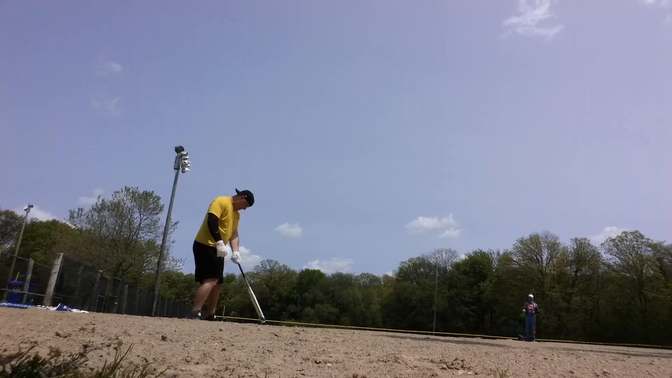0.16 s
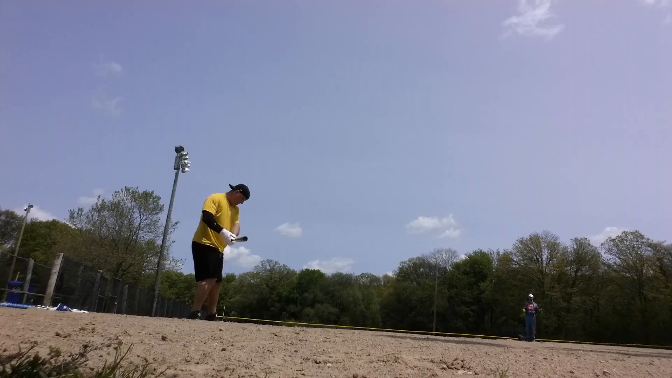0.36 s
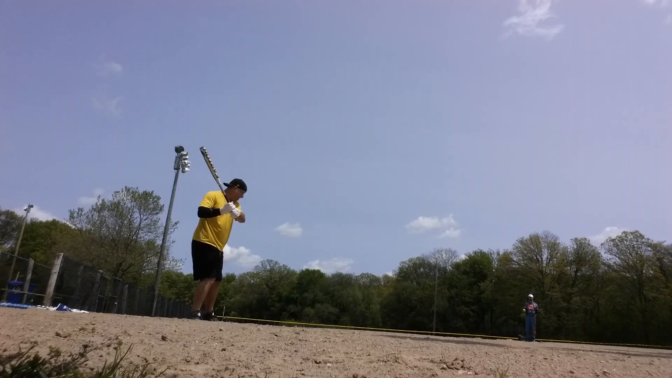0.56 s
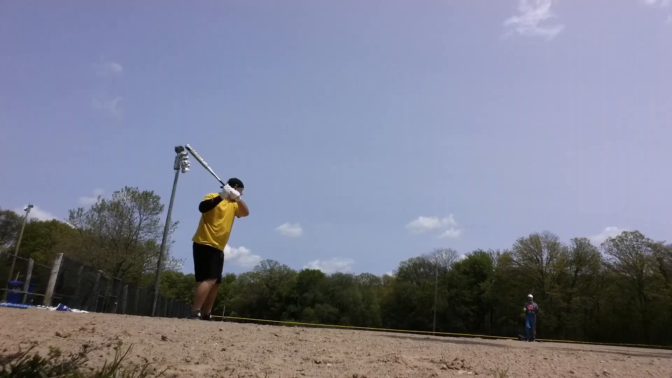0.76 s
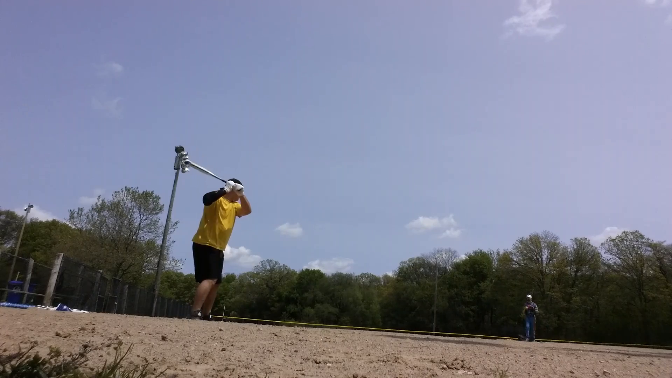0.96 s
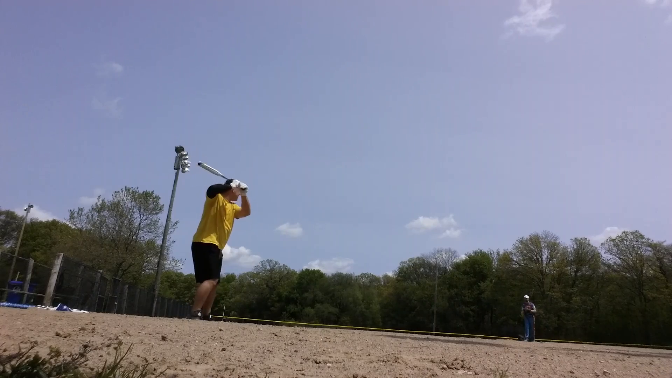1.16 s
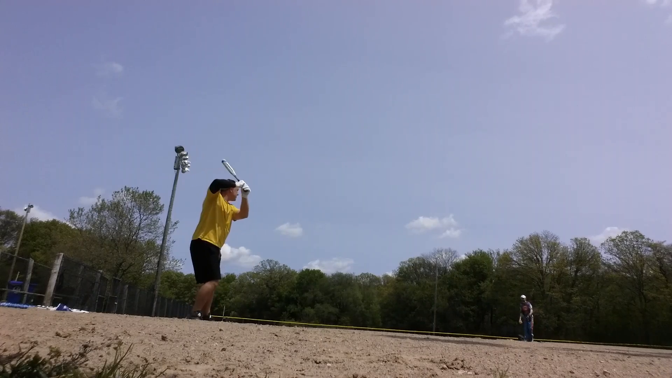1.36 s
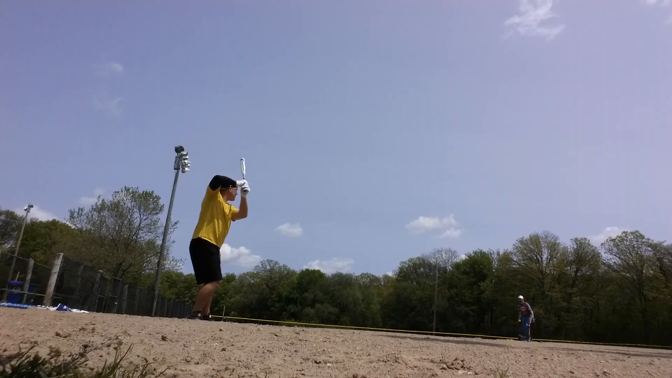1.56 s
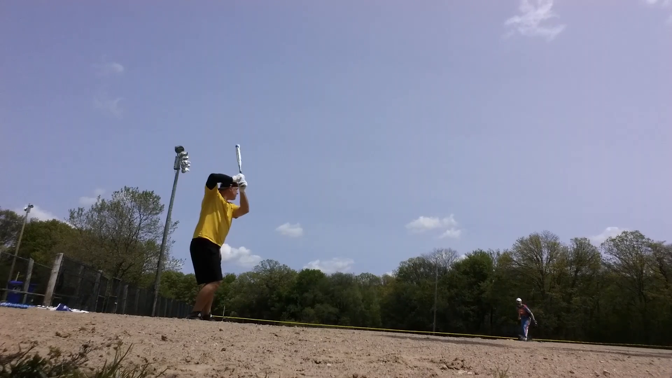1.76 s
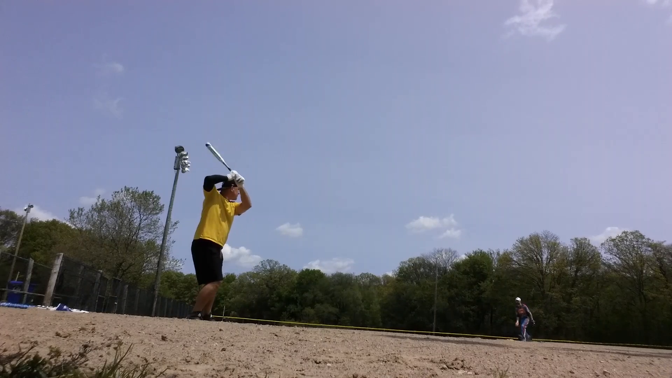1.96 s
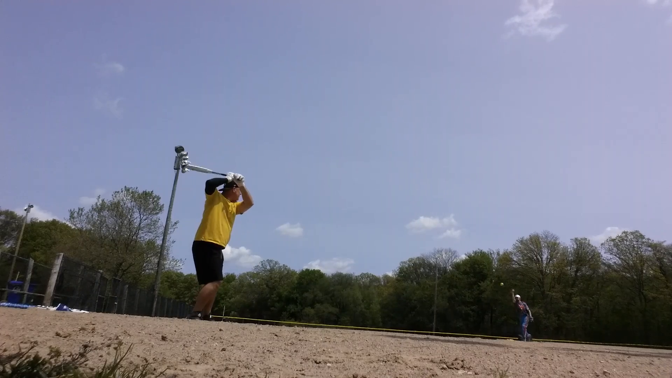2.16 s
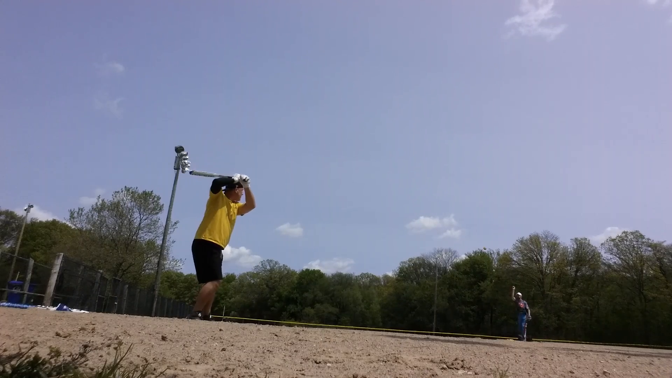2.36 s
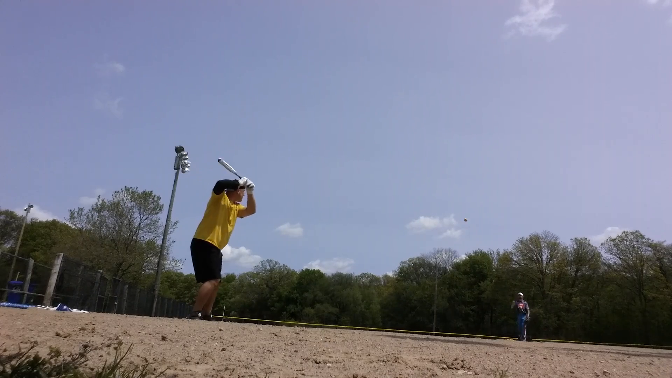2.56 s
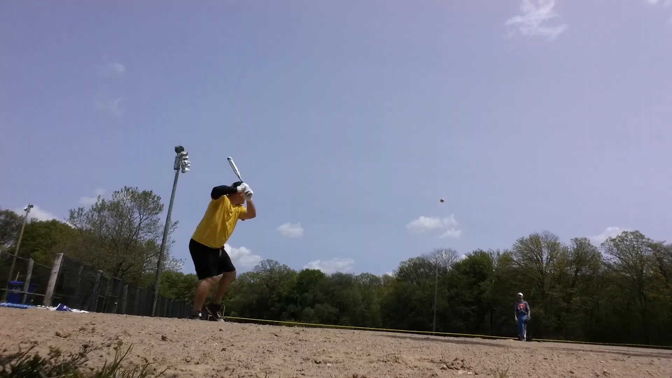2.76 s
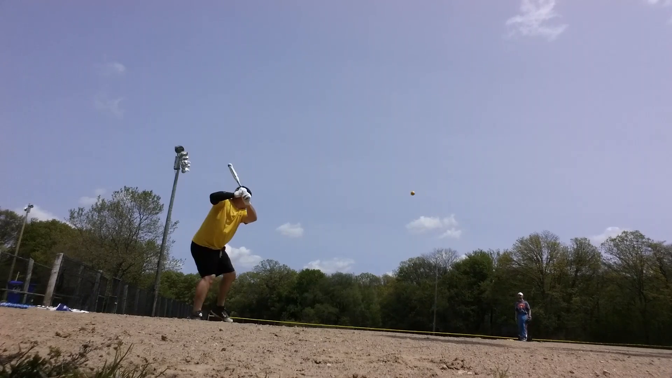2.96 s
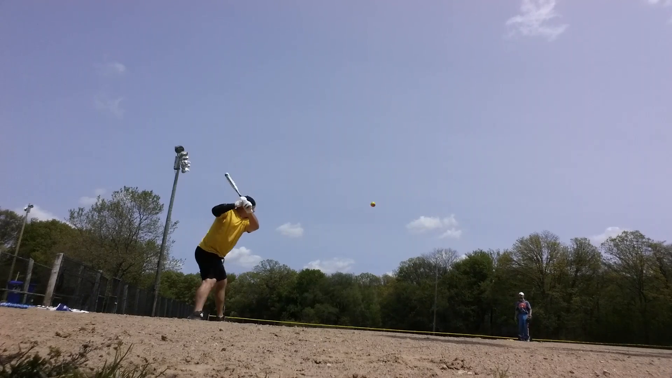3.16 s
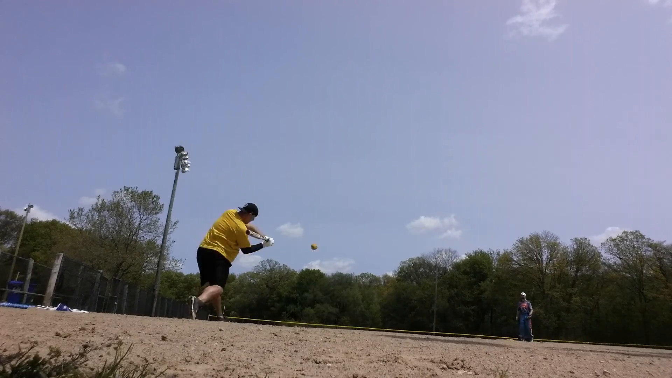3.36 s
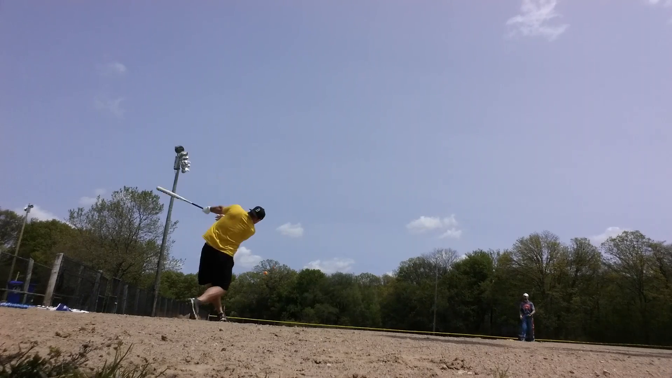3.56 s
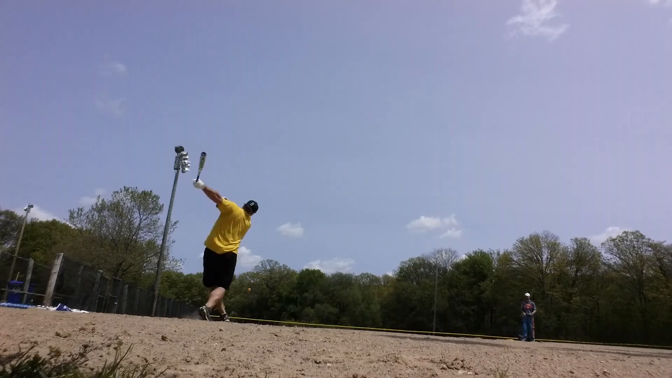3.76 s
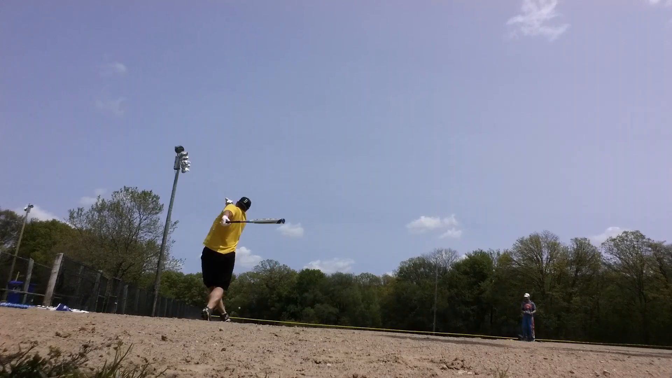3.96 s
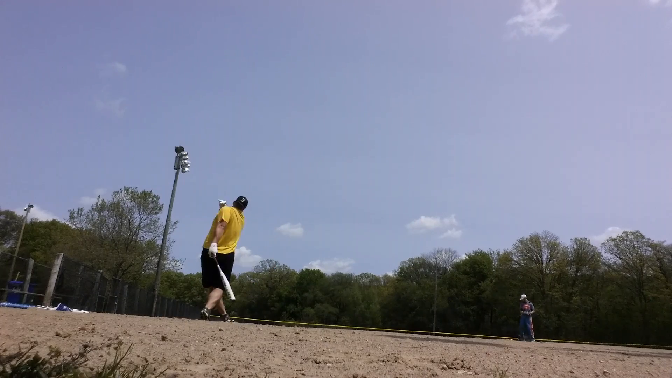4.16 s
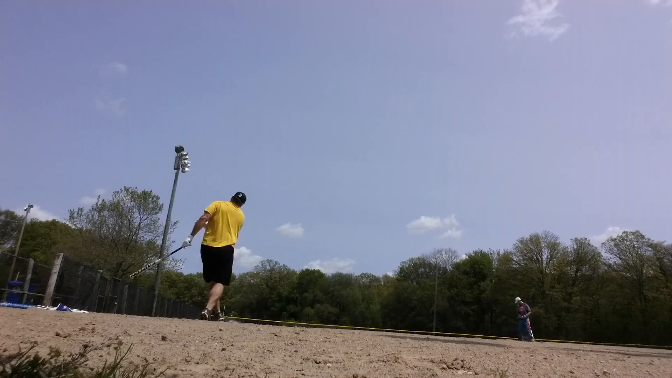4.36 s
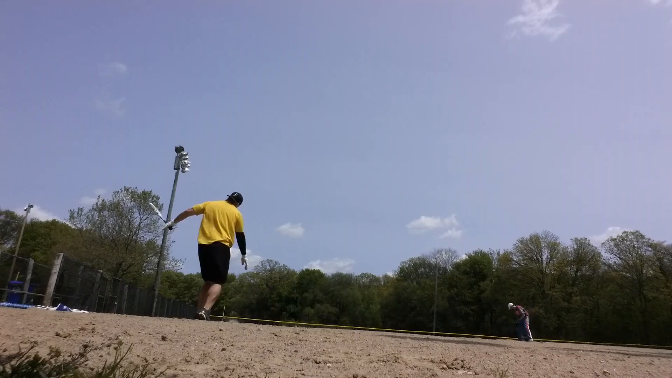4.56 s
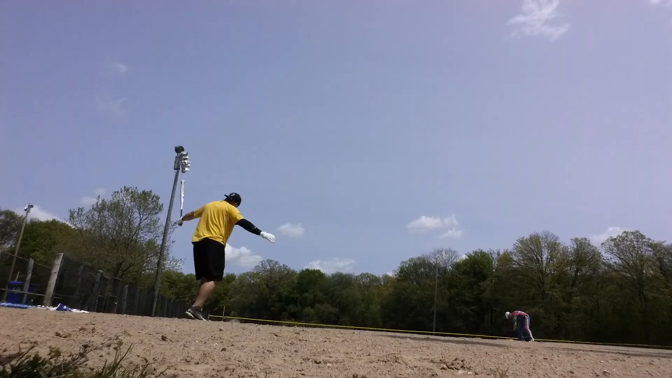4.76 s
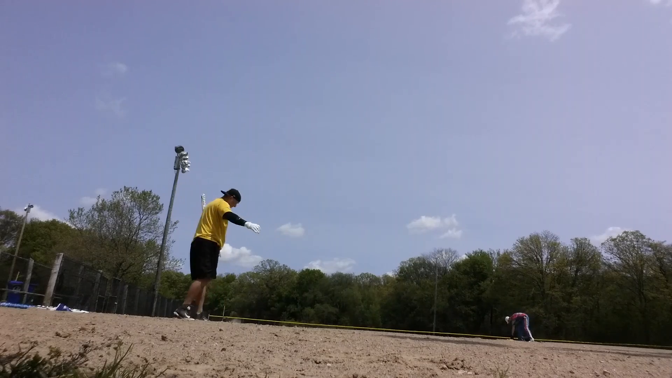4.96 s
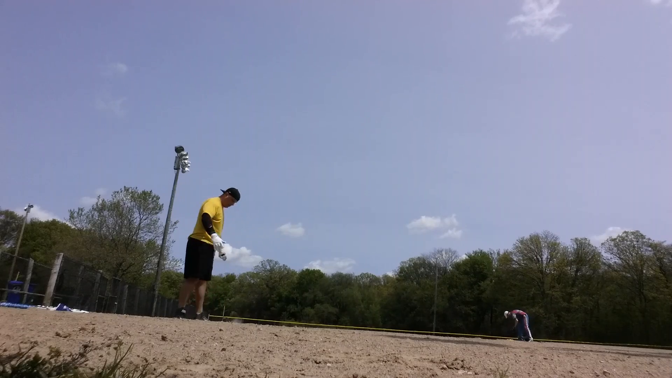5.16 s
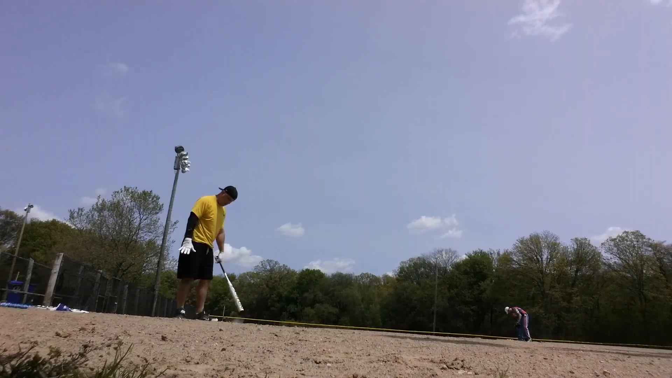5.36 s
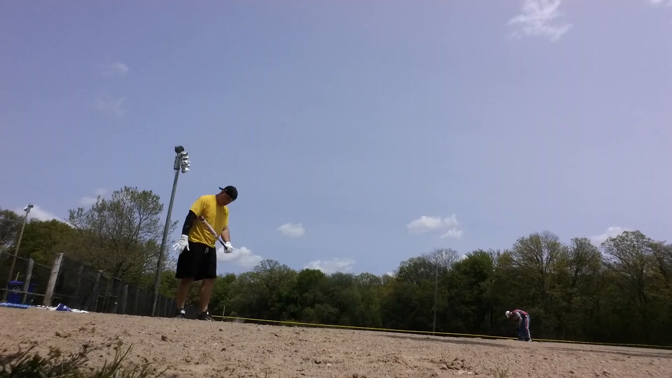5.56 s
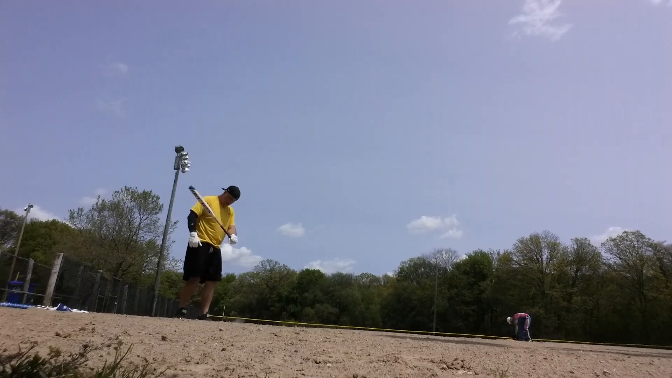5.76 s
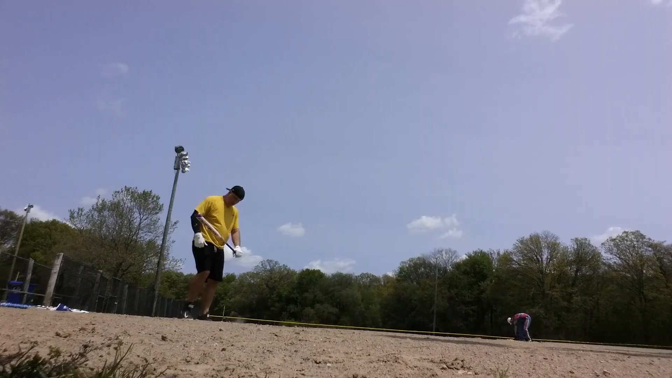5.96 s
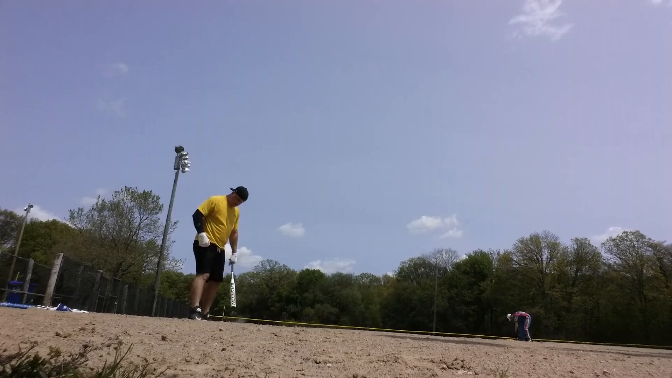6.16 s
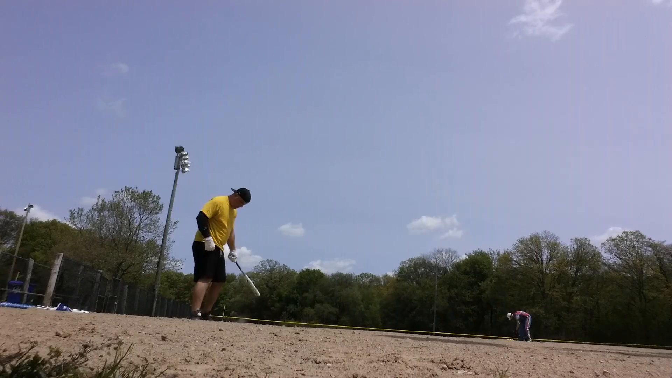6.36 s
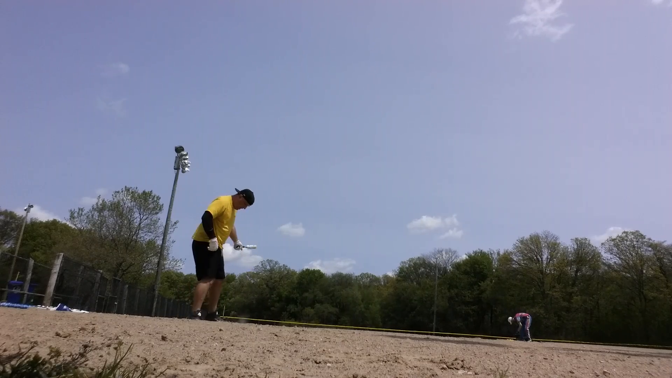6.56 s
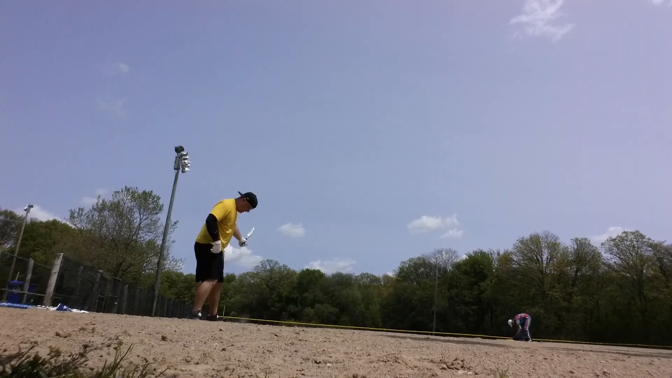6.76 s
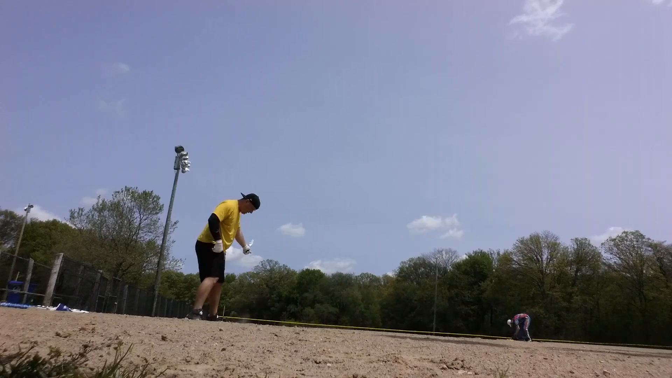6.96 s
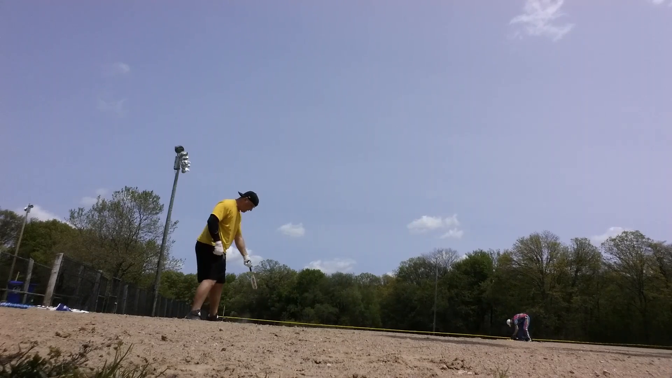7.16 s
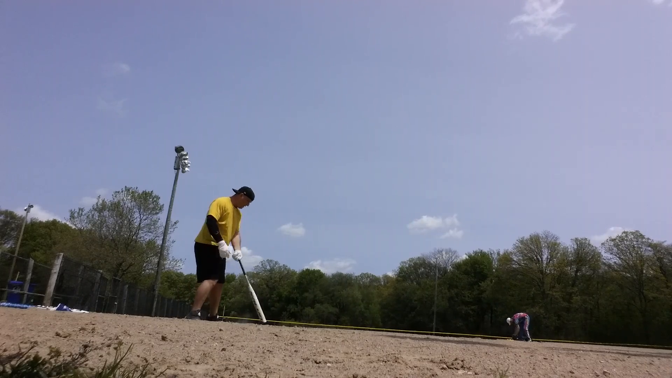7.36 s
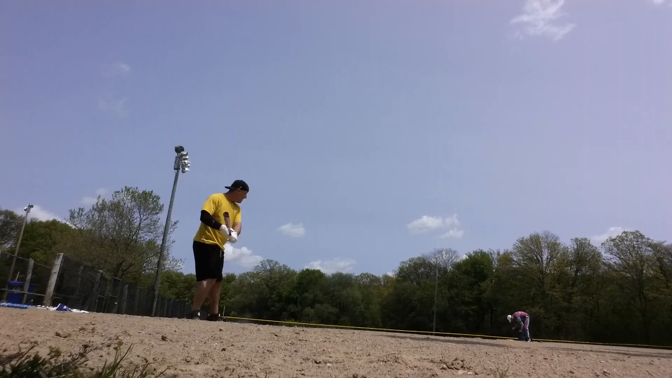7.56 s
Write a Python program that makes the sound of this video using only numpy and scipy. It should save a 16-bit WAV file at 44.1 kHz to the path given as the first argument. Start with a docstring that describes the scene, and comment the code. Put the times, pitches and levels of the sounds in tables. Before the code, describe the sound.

Quiet open field with distant traffic, faint peeps and shoe scuffs, then one sharp loud metallic bat crack that rings and echoes away.

```python
"""Traffic and a far engine drone over an open field, a bird peeps and chirps, and shoes scuff the dirt.
A metal bat swishes and cracks into a softball: shaped noise for air and contact, ringing modes for the tube.
The ping bends in pitch as the bat swings round; a backstop, a fence and the field throw the blow back.
The blow overloads the camera, whose gain control ducks for about a second; more chirps and scuffs follow."""
import sys
import numpy as np
from scipy import signal
from scipy.fft import rfft, irfft, next_fast_len
from scipy.io import wavfile
from scipy.ndimage import minimum_filter1d, map_coordinates

SR = 44100
rng = np.random.default_rng(int(sys.argv[2]) if len(sys.argv) > 2 else 0)


def unload_audio(sound):
    """Save the sound as a 16-bit wav file, at the path given as the first command line argument."""
    columns = np.transpose(np.atleast_2d(sound))
    # keep every value between -1 and 1, then stretch to whole-number steps
    steps = np.round(np.clip(columns, -1, 1) * 32767)
    wavfile.write(sys.argv[1], SR, steps.astype(np.int16))


N = 339129
TIME = np.arange(N) / SR
HIT_S = 3.6078  # the moment of contact


def amp(db):
    """Decibels to gain."""
    return 10 ** (np.asarray(db) / 20)


def unit(x):
    """Scale to rms 1."""
    return x / np.sqrt(np.mean(x ** 2) + 1e-20)


def along(points, hz):
    """Read (Hz, value) points on a log frequency axis."""
    point_hz, value = np.transpose(points)
    return np.interp(np.log(hz + 1), np.log(point_hz + 1), value)


def bell(x, centre, width):
    """A smooth bump of height 1."""
    return np.exp(-((x - centre) / width) ** 2)


def wobble(rate):
    """A smooth random curve with rate knots a second."""
    knots = rng.standard_normal(int(N * rate / SR) + 4)
    return map_coordinates(knots, [TIME * rate])


def phase_of(hz):
    """Phase in radians of a tone that follows a pitch curve."""
    return 2 * np.pi * np.cumsum(hz) / SR


def burst(start, rise, t60):
    """An envelope that swells up to its start time and then dies away."""
    swell = np.exp(np.minimum(TIME - start, 0) / rise)
    return swell * amp(-60 * np.maximum(TIME - start, 0) / t60)


def filtered(x, response):
    """Multiply the spectrum of x by a response of frequency."""
    size = next_fast_len(N + SR // 2)
    spectrum = rfft(x, size) * response(np.fft.rfftfreq(size, 1 / SR))
    return irfft(spectrum, size)[..., :N]


def pan(db):
    """Left and right gains for a left-right level difference."""
    return amp([[db / 2], [-db / 2]])


def place(x, pan_db, lag_ms):
    """The left microphone hears the sound a little later than the right."""
    shift = lambda hz: np.exp(np.outer([-1, 1], 1j * np.pi * hz * lag_ms / 10 ** 3))
    return pan(pan_db) * filtered(x, shift)


def rush(spectrum, alike):
    """Stereo noise of rms 1: level over frequency, and how alike left and right are."""
    def response(hz):
        turn = np.arccos(np.clip(along(alike, hz), -1, 1)) / 2
        return amp(along(spectrum, hz)) * np.array([np.cos(turn), np.sin(turn)])
    mid, side = filtered(rng.standard_normal((2, N)), response)
    return unit(np.array([mid + side, mid - side]))


def scatter(x, decay, delay):
    """Sound thrown back by many small surfaces, each frequency dying at its own speed."""
    hz, t, grains = signal.stft(rng.standard_normal((2, SR)), SR, nperseg=256)
    fade = amp(-60 * t / along(decay, hz)[:, None])
    tail = signal.istft(grains * fade, SR, nperseg=256)[1]
    tail = tail / np.linalg.norm(tail[0])
    tail = np.pad(tail, ((0, 0), (int(delay * SR), 0)))
    return signal.fftconvolve(x, tail, axes=1)[:, :N]


# colour of the microphones' hiss: freq_hz, relative_level_db (per Hz)
HISS_COLOUR = [(1000, -12.5), (4000, 0.5), (6000, 1), (9000, -2.5), (12500, 0.5), (15400, 2)]


def hiss():
    """The microphones' own noise, unrelated left and right."""
    return amp(-62) * rush(HISS_COLOUR, [(1000, 0)]) * pan(0.95)


# colour of the low traffic rumble: freq_hz, relative_level_db (per Hz)
RUMBLE_COLOUR = [(20, -43), (38, -21), (58, -4.5), (115, 1), (160, -3.5), (230, -6.5), (330, -18.5),
                 (600, -49)]
# colour of the tyre wash: freq_hz, relative_level_db (per Hz)
TYRE_COLOUR = [(120, -16.5), (300, 1), (450, -1), (650, -2), (1000, -0.5), (1250, -7.5), (1700, -7.5),
               (2200, -14.5), (2700, -18), (3200, -23.5), (5000, -35), (9000, -45)]
# how alike the traffic is left and right: freq_hz, likeness (0 to 1)
TRAFFIC_LIKENESS = [(100, .98), (250, 0.98), (520, 1), (900, 0.46), (1350, .66), (2000, .3), (3500, 0.035)]
RUMBLE_DB, TYRE_DB = -44, -48.5  # levels at the start
RUMBLE_DB_PER_S, TYRE_DB_PER_S = -0.17, 0.2548  # slow drift


def traffic():
    """Low rumble and tyre wash, as shaped noise, from a road off to the right."""
    rumble_db = RUMBLE_DB + RUMBLE_DB_PER_S * TIME + 0.7 * wobble(10)
    tyre_db = TYRE_DB + TYRE_DB_PER_S * TIME + 0.8 * wobble(9.3)
    rumble = amp(rumble_db) * rush(RUMBLE_COLOUR, TRAFFIC_LIKENESS)
    tyres = amp(tyre_db) * rush(TYRE_COLOUR, TRAFFIC_LIKENESS)
    return place(rumble + tyres, pan_db=-4.0, lag_ms=0.35)


# partials of the engine: order (multiple of the firing rate), relative_level_db
FIRING_ORDERS = [(1, -15.5), (1.5, -14), (2, -1), (2.5, -6.5), (3, 1), (3.5, -8.5), (4, -16.5), (5, -24.5)]
# resonance of the exhaust: freq_hz, gain_db
EXHAUST_RESONANCE = [(50, -9.5), (100, -6.5), (130, 0), (170, -5), (195, -13.5), (330, -10.5)]
FREE_HZ = 64.55  # firing rate when running free
SAG_HZ, SAG_AT_S, SAG_S = 15.9, 2.06, 1.46  # sag under load: depth, deepest moment, width
OVERSHOOT_HZ, OVERSHOOT_AT_S, OVERSHOOT_S = 3.1, 4.62, 0.85  # it races as the load comes off
ENGINE_DB, LOAD_DB_PER_HZ = -44, 0.2022  # base level when free, rise as it is dragged down
BOOM_HZ, BOOM_WIDTH_HZ, BOOM_DB = 56.4, 2.4, 5  # the firing rate at which it booms


def engine():
    """A far engine sags, overshoots and settles; its orders slide through the exhaust's resonance."""
    sag_hz = SAG_HZ * bell(TIME, SAG_AT_S, SAG_S)
    overshoot_hz = OVERSHOOT_HZ * bell(TIME, OVERSHOOT_AT_S, OVERSHOOT_S)
    firing_hz = FREE_HZ - sag_hz + overshoot_hz
    load_db = LOAD_DB_PER_HZ * (FREE_HZ - firing_hz)
    engine_db = ENGINE_DB + load_db + BOOM_DB * bell(firing_hz, BOOM_HZ, BOOM_WIDTH_HZ)
    phase = phase_of(firing_hz * (1 + 0.0025 * wobble(6.8)))
    drone = 0
    for order, order_db in FIRING_ORDERS:
        exhaust_db = along(EXHAUST_RESONANCE, order * firing_hz)
        level = amp(engine_db + order_db + exhaust_db + 1.6 * wobble(4))
        drone = drone + level * np.sin(order * phase + 0.087 * wobble(15))
    return place(drone, pan_db=-3.0, lag_ms=0.31)


# chirps: start_s, level_db (before accents), time_stretch, lowest_hz (before lingering), dip_accent_db
CHIRP_CALLS = [(1.665, -54.5, 0.96, 2150, 10), (5.138, -52, 0.96, 2280, -1), (6.478, -52, 1.1, 2100, -1)]
# fainter birds: centre_s, level_db, pitch_hz (before a slight waver)
PEEP_CALLS = [(.68, -73, 3880), (.97, -73, 3900), (1.17, -72, 3900), (1.34, -69.5, 3900), (1.52, -71, 3900),
              (5.349, -67, 3275), (5.478, -69, 3570)]
START_HZ, NOTE_HZ = 3100, 2620  # first pitch before lingering; the note the chirp settles on
FALL_S, RETURN_S = 0.057, 0.0193  # slide down and slide back, before the time stretch
CHIRP_S, EDGE_S = 0.1, 0.0059  # length and fade at each end, before the time stretch
LINGER, LINGER_WIDTH_HZ = 0.54, 260  # pitch is drawn to the note: share, range
NOTE_DB, NOTE_WIDTH_HZ, SWELL_DB_PER_S = 9.5, 80, 72  # louder on the note, and towards the end
PEEP_S = 0.048  # full width of the peep's bell


def chirps():
    """A whistle slides down and back up to its note, loudest near the note."""
    song = 0
    for start_s, level_db, stretch, lowest_hz, dip_db in CHIRP_CALLS:
        age = np.clip((TIME - start_s) / stretch, 0, CHIRP_S)
        hz = np.interp(age, [0, FALL_S, FALL_S + RETURN_S], [START_HZ, lowest_hz, NOTE_HZ])
        hz = hz - LINGER * (hz - NOTE_HZ) * bell(hz, NOTE_HZ, LINGER_WIDTH_HZ)
        note_db = NOTE_DB * bell(hz, NOTE_HZ, NOTE_WIDTH_HZ)
        accent_db = note_db + dip_db * bell(age, FALL_S, width=0.0097)
        swell_db = SWELL_DB_PER_S * (age - FALL_S)
        gate = np.minimum(np.minimum(age, CHIRP_S - age) / EDGE_S, 1)
        whistle = np.sin(phase_of(hz * (1 + 0.013 * wobble(300))))
        song = song + gate * amp(level_db + accent_db + swell_db) * whistle
    return song


def peeps():
    """Other birds farther off: short whistles with a slight waver."""
    song = 0
    for centre_s, level_db, hz in PEEP_CALLS:
        whistle = np.sin(phase_of(hz * (1 + 0.014 * wobble(60))))
        song = song + amp(level_db) * bell(TIME, centre_s, PEEP_S / 2) * whistle
    return song


def birds():
    """Leaves blur the whistles with a short scatter and the woods hold them with a long one."""
    song = place(chirps() + peeps(), pan_db=-7.0, lag_ms=0.018)
    leaves = scatter(song, [(2600, 0.2)], delay=0.004)
    woods = scatter(song, [(2600, 1.26)], delay=0.018)
    return song + amp(-13) * leaves + amp(-5.5) * woods


# thuds and scuffs on the dirt: peak_s, level_db, centre_hz, rise_s, t60_s, grit_db (at 4 x centre_hz)
DIRT_SCUFFS = [(1.777, -33.5, 165, 0.0074, 0.089, -70), (2.699, -56, 1194, 0.0041, 0.068, -20),
               (3.16, -50.5, 940, 0.045, 0.3, -50), (3.341, -33, 700, 0.0006, 0.024, -42),
               (3.495, -24.5, 1100, .0004, 0.022, -54), (4.384, -28.5, 320, 0.0015, 0.1, -45),
               (6.339, -61, 3000, 0.0019, 0.053, -6.5), (6.514, -55.5, 3520, 0.0021, 0.038, -10)]


def scuffs():
    """Short dull thuds and rubs with grit on top; each one's energy is set by its envelope."""
    dirt = 0
    for peak_s, level_db, hz, rise_s, t60_s, grit_db in DIRT_SCUFFS:
        colour = [(hz / 4, -30), (hz * 0.58, 0), (hz * 1.1, -2), (hz * 4, grit_db), (16000, grit_db - 7.5)]
        envelope = burst(peak_s, rise_s, t60_s)
        energy = np.sqrt(np.mean(envelope ** 2))
        dirt = dirt + amp(level_db) * energy * unit(envelope * rush(colour, [(100, 0.8)]))
    return dirt * pan(-3.5)


SWISH_S, SWISH_DB, SWISH_HALF_S = 3.477, -43.5, 0.071  # loudest moment, level, time to fall 6 dB
FASTEST_S, FAST_S = 3.515, 0.052  # barrel speed: peak moment, width
SLOW_HZ, FAST_HZ = 450, 1330  # eddy pitch when slow and at the fastest


def swish():
    """Air shed by the barrel swells as it passes and rises in pitch with its speed."""
    swell = 0.5 ** (((TIME - SWISH_S) / SWISH_HALF_S) ** 2)
    level = amp(SWISH_DB + 2.4 * wobble(60)) * swell
    centre_hz = SLOW_HZ + (FAST_HZ - SLOW_HZ) * bell(TIME, FASTEST_S, FAST_S)
    eddies = rush([(10, -2), (500, -1.5), (1100, -8), (2000, -21.5), (6000, -44)], [(100, 0.99)])
    # low noise times a gliding tone makes a band of noise round the eddy pitch
    air = unit(eddies * np.cos(phase_of(centre_hz)))
    return place(level * air, pan_db=-5.0, lag_ms=0.15)


def thock(db, squash_s):
    """The ball is squashed and springs back: one push of air and its suction."""
    u = np.maximum(TIME - HIT_S, 0) / squash_s
    return amp(db) * (TIME >= HIT_S) * (1 - u) * np.exp(-u) * pan(-1.3)


# colour of the contact: freq_hz, relative_level_db (per Hz)
CRACK_COLOUR = [(40, -38), (200, -17.5), (330, -8), (480, 7), (750, 0.5), (1000, 5.5), (1400, -6.5),
                (2300, -2.5), (4000, -2), (6500, -7.5), (9000, -8), (9900, -23), (11000, -17.5),
                (15000, -14.5)]


def crack():
    """Noise of the contact itself, then of dense short-lived wall modes and spray off the ground."""
    struck = TIME >= HIT_S
    contact = amp(-3.5) * struck * burst(HIT_S, 1, t60=0.017)
    wall_and_spray = amp(-18.0) * struck * burst(HIT_S, 1, t60=0.15)
    return (contact + wall_and_spray) * rush(CRACK_COLOUR, [(400, 0.41), (2500, 0.23), (6000, 0.077)])


ROUND_AFTER_S, ROUND_S = 0.087, 0.003  # the barrel comes round the batter: when, how suddenly
LOBES_PER_S, SPIN_DOWN_S = 16.2, 0.4  # the slowing turn: rate at the first null, time constant
END_ON_AFTER_S, NULL_SHARE = 0.073, 0.05  # first null after contact, gain left in a null
PING_DB, PING_T60_S, PING_FLUTTER_DB = -17.5, 0.76, 3.2  # the main mode's long after-ring
SHADOW_AFTER_S, SHADOW_S, SHADOW_DB = 0.222, 0.008, -9  # behind the batter's back: when, speed, loss


def after_ring_gain(age):
    """The bat comes round the batter, its turn sweeps lobes past the camera, then his body shades it."""
    passed = lambda when, width: (1 + np.tanh((age - when) / width)) / 2
    lobes = LOBES_PER_S * SPIN_DOWN_S * (1 - np.exp((END_ON_AFTER_S - age) / SPIN_DOWN_S))
    facing = NULL_SHARE + np.abs(np.sin(np.pi * lobes)) ** 0.5
    db = PING_DB + PING_FLUTTER_DB * wobble(90) + SHADOW_DB * passed(SHADOW_AFTER_S, SHADOW_S)
    return passed(ROUND_AFTER_S, ROUND_S) * facing * amp(db) * burst(HIT_S, 1, PING_T60_S)


# short ball resonances and long bat modes: pitch_hz (at contact), level_db, t60_s, left_right_db
BAT_MODES = [(470, -9, .03, 0), (590, -9.5, .08, -2.5), (740, -4, .014, -3), (905, -18, .06, -3),
             (1088, -7, .07, -2), (1624, -5.5, .25, -4.5), (2137, -23, .06, -4), (2550, -5, .008, -2),
             (4393, -10, .08, 4), (4590, -12, .07, 2), (5048, -17, .1, -3), (5766, -28, .09, 2),
             (8400, -13, .06, 9), (8748, -22, .075, 5), (9222, -24, .08, 2), (10400, -28, .08, 0),
             (11180, -33, .09, 1), (13485, -21, .06, 7), (14180, -23, .07, 3), (15220, -26, .08, 1)]
# pitch bend of the follow-through: time_s, bend_hz (only its ratio to the first row is used)
SWING_BEND = [(3.61, 1614), (3.672, 1638), (3.694, 1786), (3.72, 1783), (3.744, 1747), (3.834, 1750),
              (3.844, 1791), (3.93, 1794)]
PING_HZ = 1624  # main mode at contact
TURN_AWAY_DB_PER_S = 260  # extra fade as the barrel turns away after contact
FLASH_AFTER_S, FLASH_S, FLASH_DB = 0.0205, 0.0037, -1.5  # its loud side sweeps once over the camera


def bat_ring():
    """The ringing tube swings away from the camera and then towards it, bending every mode alike."""
    bend_s, bend_hz = np.transpose(SWING_BEND)
    bend = np.interp(TIME, bend_s, bend_hz) / bend_hz[0]
    struck = TIME >= HIT_S
    age = np.maximum(TIME - HIT_S, 0)
    heard_age = np.cumsum(bend * struck) / SR  # time since contact as the bent pitch counts it
    beam = amp(-TURN_AWAY_DB_PER_S * age) + amp(FLASH_DB) * bell(age, FLASH_AFTER_S, FLASH_S)
    ring = 0
    for hz, level_db, t60_s, side_db in BAT_MODES:
        mode = struck * burst(HIT_S, 1, t60_s) * np.cos(2 * np.pi * hz * heard_age)
        ring = ring + pan(side_db) * amp(level_db) * mode
    ping = after_ring_gain(age) * np.cos(2 * np.pi * PING_HZ * heard_age)
    return place(beam * ring + pan(-9.0) * ping, pan_db=-0.5, lag_ms=0.017)


# echo delays: backstop_s, fence_s
ECHO_DELAYS = [.037, .107]
# dying away over the field: freq_hz, t60_s
FIELD_DECAY = [(150, 0.85), (600, 1.6), (1100, 1.1), (2600, .9), (5000, 0.88), (9000, 0.67), (11000, .33),
               (15000, 0.4)]
# what the surroundings throw back: freq_hz, gain_db
REFLECTED_COLOUR = [(200, -3), (400, -1), (600, 3.5), (800, 5.5), (1100, 3), (1500, 0), (2300, 0.5),
                    (3300, -6), (4500, -2.5), (7000, 1), (11000, 1.5)]


def surroundings(ring, snap):
    """The backstop and the fence answer the blow, and it washes long over the field."""
    near_s, far_s = ECHO_DELAYS
    backstop = scatter(snap + amp(-6.5) * ring, [(500, 0.13), (4500, 0.05), (10000, 0.06)], delay=near_s)
    fence = scatter(snap + amp(-18) * ring, [(900, 0.065), (8000, 0.11)], delay=far_s)
    wash = scatter(snap + amp(-9) * ring, FIELD_DECAY, delay=0.016)
    answers = amp(-20.5) * backstop + amp(-18.0) * fence + amp(-14.0) * wash
    return filtered(answers, lambda hz: amp(along(REFLECTED_COLOUR, hz)))


def hit():
    """The blow: the ball's push of air, the ringing bat, the crack and the answers around."""
    ring = bat_ring()
    snap = crack()
    return thock(db=-7.5, squash_s=0.00013) + ring + snap + surroundings(ring, snap)


def scene():
    """Everything on the field, over the microphones' own hiss."""
    background = hiss() + traffic() + engine() + birds()
    return background + scuffs() + swish() + hit()


def gain_control(x, limit_db, hold, attack, release):
    """A loud peak turns the gain down; it is held there and then creeps back (times in s)."""
    peak_db = 20 * np.log10(np.abs(x).max(axis=0) + 1e-9)
    need_db = np.minimum(limit_db - peak_db, 0)
    size = int(hold * SR) // 2 * 2 + 1
    held_db = minimum_filter1d(need_db, size, origin=size // 2, mode="constant")
    lag = lambda tau: signal.lfilter([1 / (tau * SR)], [1, 1 / (tau * SR) - 1], held_db)
    return x * amp(np.minimum(lag(attack), lag(release)))


def record(dry):
    """The camera rounds off overloads, cuts the deepest bass, ducks its gain and limits the treble."""
    low_cut_hz, top_hz = 45, 15550
    clipped = dry / (1 + np.abs(dry) ** 6) ** (1 / 6)
    thin = signal.sosfilt(signal.butter(3, low_cut_hz, "high", fs=SR, output="sos"), clipped)
    ducked = gain_control(thin, limit_db=-14.0, hold=0.84, attack=0.15, release=0.29)
    return filtered(ducked, lambda hz: hz < top_hz)


dry = scene()
out = record(dry)
unload_audio(out)
```